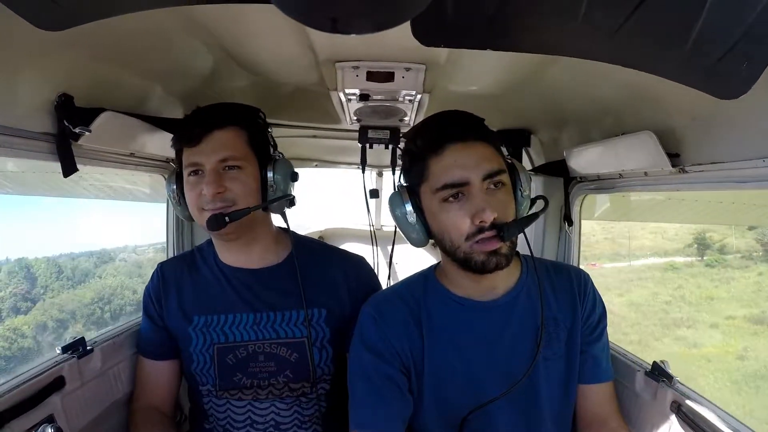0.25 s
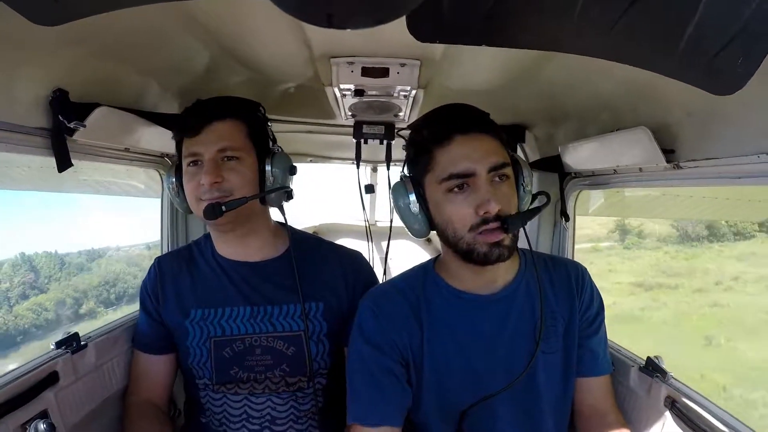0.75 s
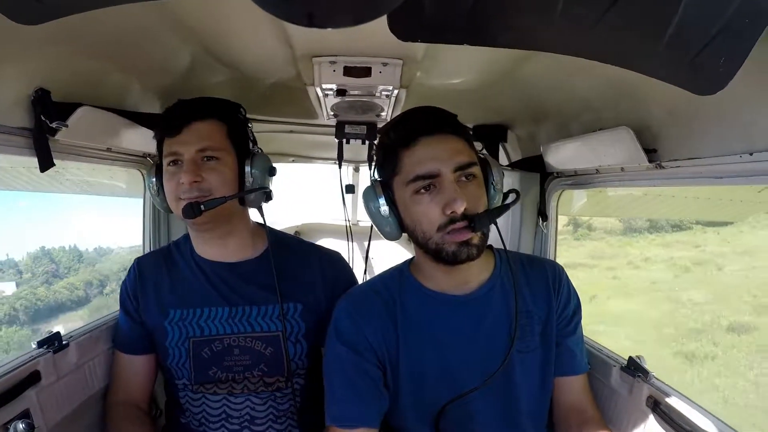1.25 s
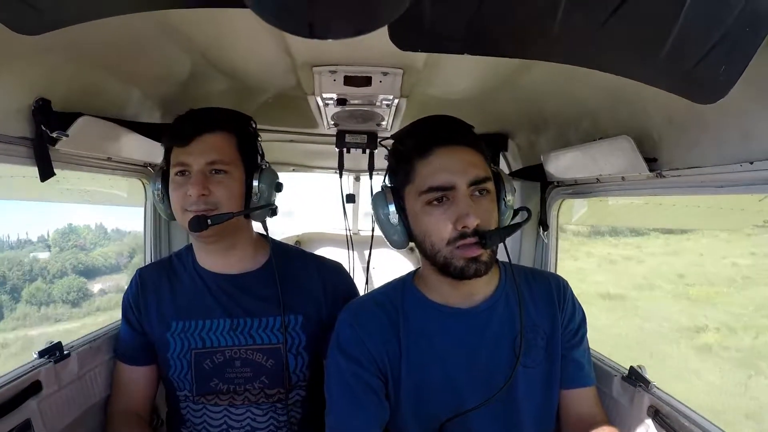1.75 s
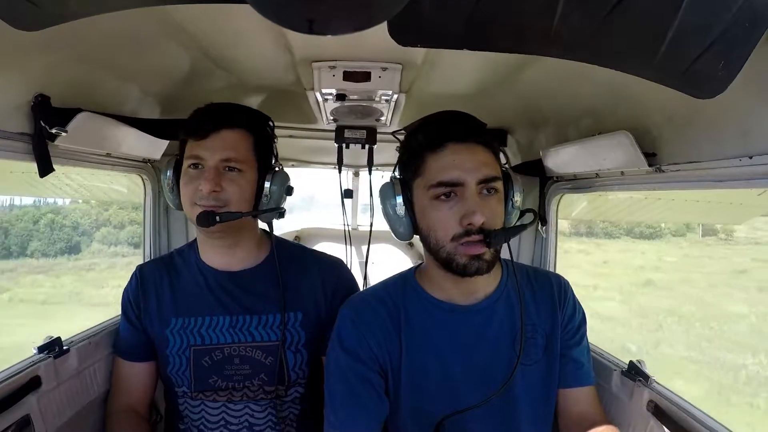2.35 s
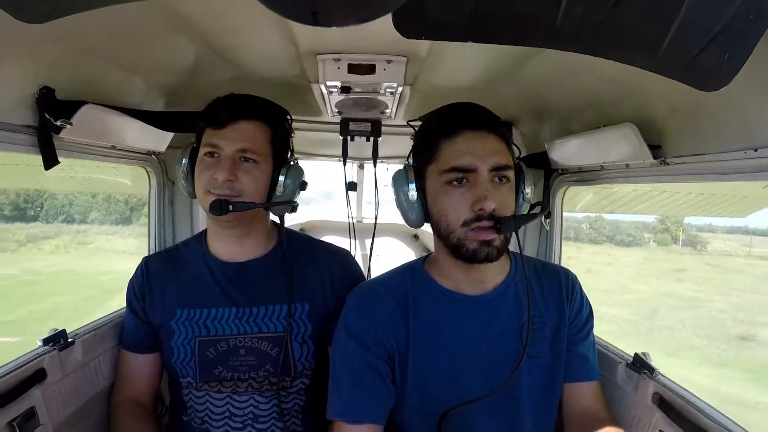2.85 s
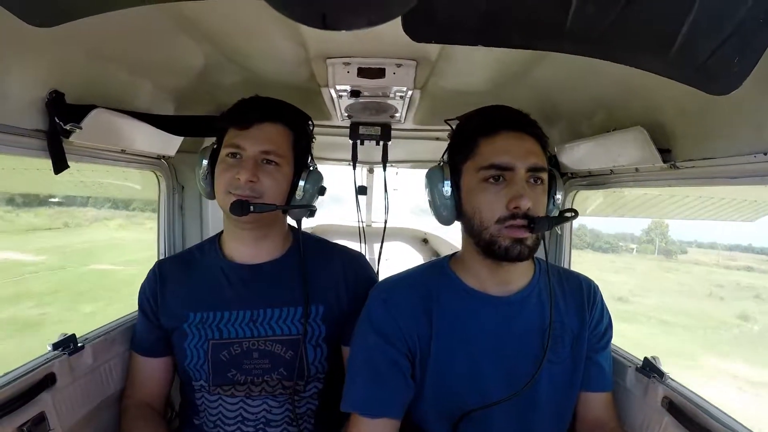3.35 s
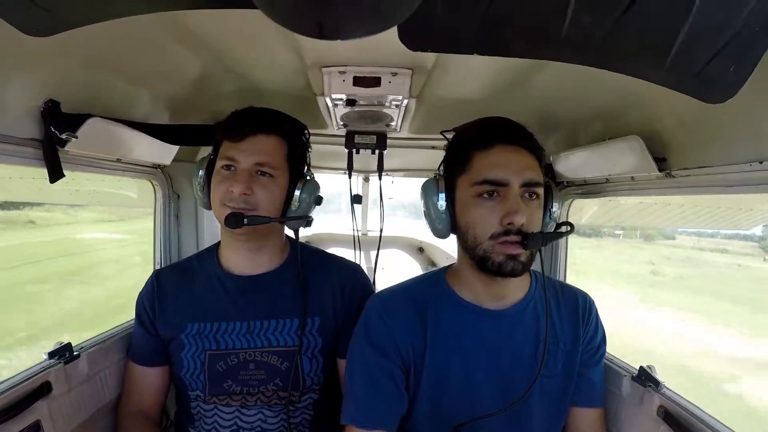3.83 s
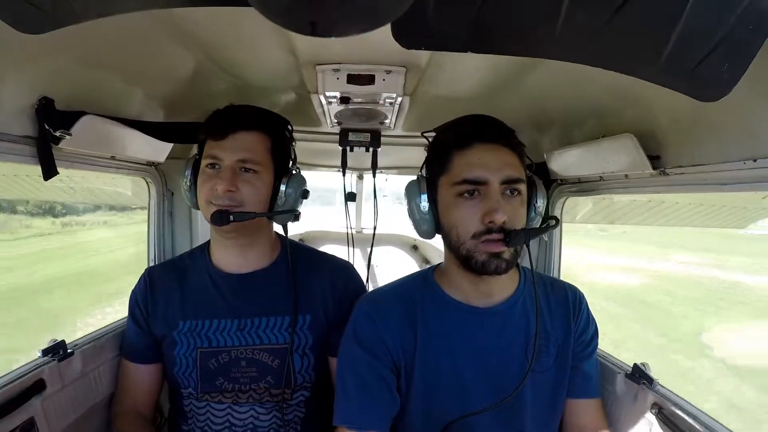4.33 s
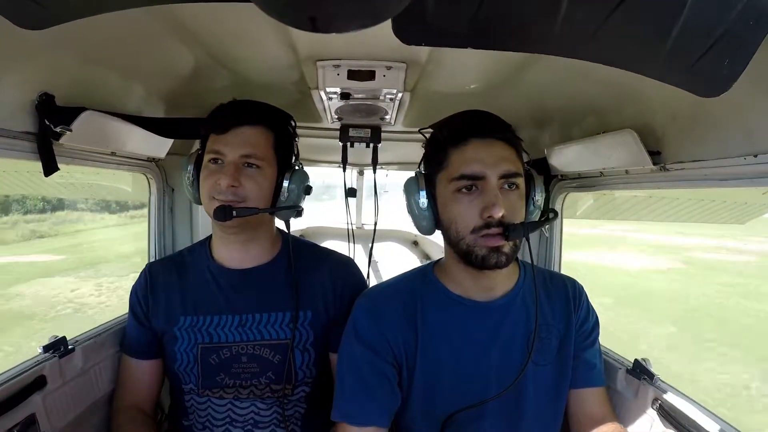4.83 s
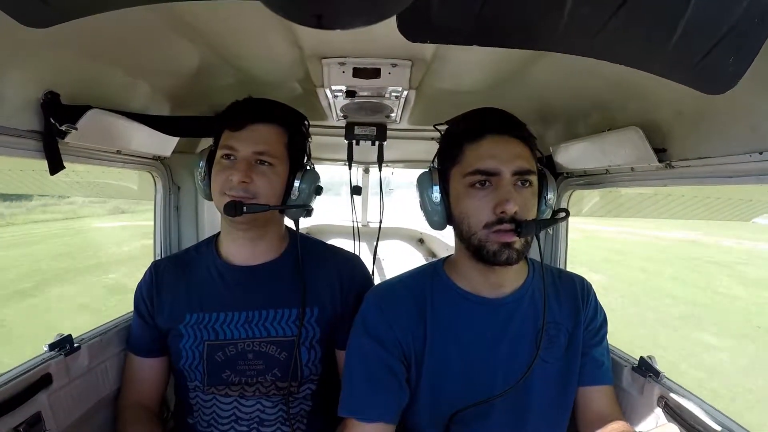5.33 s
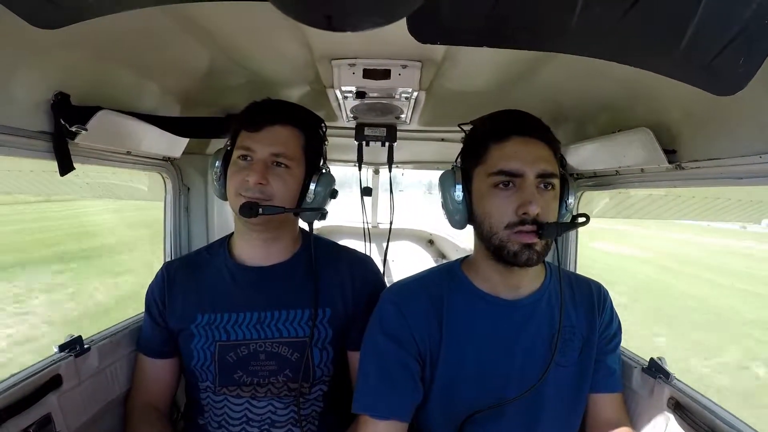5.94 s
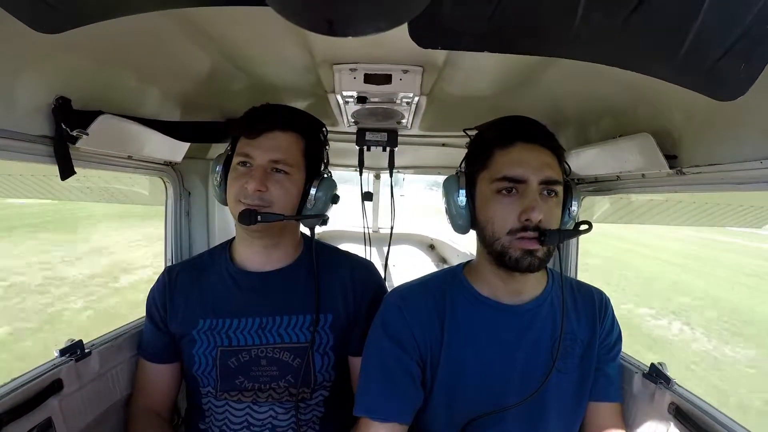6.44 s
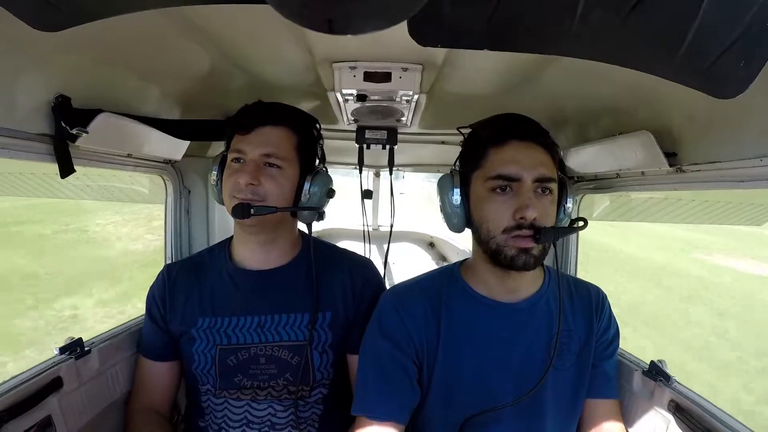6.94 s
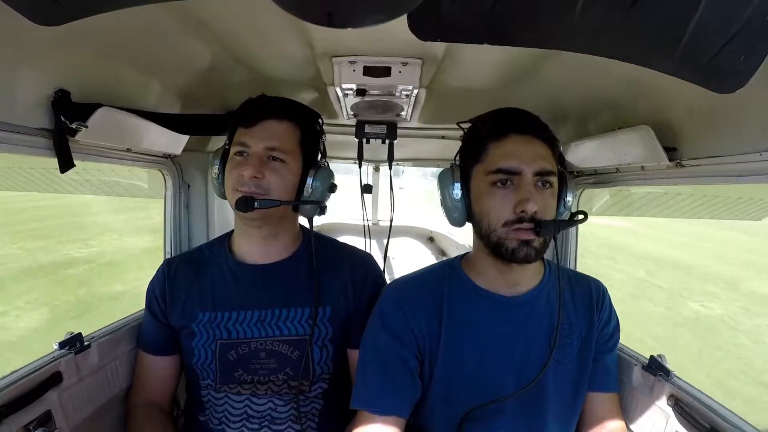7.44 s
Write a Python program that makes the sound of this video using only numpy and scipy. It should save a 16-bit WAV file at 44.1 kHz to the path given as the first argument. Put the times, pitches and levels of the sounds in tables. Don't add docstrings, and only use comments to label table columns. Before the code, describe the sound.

Low lumpy wind roar buffets a small microphone inside a gliding light aircraft cabin, with hard bassy slaps and thin gusty hiss.

```python
import sys
import numpy as np
from scipy import signal
from scipy.fft import rfft, irfft
from scipy.io import wavfile
from scipy.ndimage import uniform_filter1d

SR = 44100
rng = np.random.default_rng(int(sys.argv[2]) if len(sys.argv) > 2 else 0)


def generate_wav(signal):
    frames = np.transpose(np.atleast_2d(signal))
    scaled = np.clip(frames, -1, 1) * 32767
    pcm = np.round(scaled).astype(np.int16)
    wavfile.write(sys.argv[1], SR, pcm)


def ratio_of_db(decibels):
    return 10 ** (np.asarray(decibels, float) / 20)


N = 338688


def evened(x):
    return x / np.sqrt(np.mean(x ** 2) + 1e-20)


def curve(rows, column, t):
    rows = np.asarray(rows, float)
    return np.interp(t, rows[:, 0], rows[:, column])


def bumps(rows, t):
    return sum(db * np.exp(-4 * ((t - middle_s) / length_s) ** 2) for middle_s, db, length_s in rows)


def flicker(low_hz, high_hz):
    step = 32
    count = N // step + 1
    hz = np.fft.rfftfreq(count, step / SR) + 1e-3
    low_cut = (hz / (low_hz + hz)) ** 2
    shape = low_cut / np.sqrt(hz) / (1 + (hz / high_hz) ** 2)
    slow = irfft(rfft(rng.standard_normal(count)) * shape, count)
    return evened(np.interp(np.arange(N) / step, np.arange(count), slow))


def turbulence(shape, size, patchy_db, patch_hz, patch_s, tilt, pivot_hz):
    hop = size // 4
    frames = N // hop + 5
    hz = np.fft.rfftfreq(size, 1 / SR) + 1
    real, imaginary, patches = rng.standard_normal((frames, len(hz), 3)).T
    patches = uniform_filter1d(patches, max(1, round(patch_hz * size / SR)), 0)
    patches = evened(uniform_filter1d(patches, max(1, round(patch_s * SR / hop)), 1))
    shape_hz, shape_db = np.transpose(shape)
    colour = ratio_of_db(np.interp(np.log(hz), np.log(shape_hz), shape_db, left=-150))[:, None]
    lean = tilt[np.minimum(np.arange(frames) * hop, N - 1)]
    octaves = np.clip(np.log2(hz / pivot_hz), -.7, 1.3)[:, None]
    leaned = colour * ratio_of_db(octaves * lean)
    leaned *= np.linalg.norm(colour) / np.linalg.norm(leaned, axis=0)
    spectra = (real + 1j * imaginary) * leaned * ratio_of_db(patchy_db * patches)
    return evened(signal.istft(spectra, nperseg=size, noverlap=size - hop)[1][:N])


# start_s, speed_db (about the mean), seal_opening_db, leak_brightness_db_per_octave
AIRFLOW = [(0, -1, 0.5, 1), (.62, 0.1, 2, 1.5), (.9, 0, 0.5, 1), (1.35, 1, 0.5, 2), (1.6, 1, -1, -.5),
           (2.05, 0, 0, 1), (2.4, 2.5, -0.5, 0.5), (2.55, -1.5, 1, -.5), (3.6, -0.83, -0.5, -.5),
           (4.35, -1.5, 1.5, 1.5), (4.8, 3, 1, 1), (5.15, 0.5, -1.5, -1), (5.45, 1.5, -1, 0),
           (5.85, 0, 0, -.5), (6.58, -1.5, 2.5, 0), (6.75, 1.5, 0.5, 1.5), (7.35, 2, 2, 0.5),
           (7.68, 2, -0.5, -1.5)]


def airflow(t):
    return curve(AIRFLOW, 1, t), curve(AIRFLOW, 2, t), curve(AIRFLOW, 3, t)


# middle_s, level_db, length_s
PUFFS = [(0.26, 5, .05), (.309, -4, 0.025), (.394, -2, 0.04), (0.492, 3, .04), (0.52, -3, .03),
         (0.726, 1, .07), (0.88, -1, 0.1), (1.066, 2.5, 0.055), (1.344, -2, 0.035), (1.378, 1.5, 0.037),
         (1.703, -0.5, 0.037), (1.735, 5.5, 0.02), (2.332, 6, 0.033), (2.358, -8, 0.034),
         (2.44, -0.5, 0.044), (3.238, 1.5, 0.054), (4.06, 2, 0.18), (4.617, -0.5, 0.08), (4.77, 2.5, .06),
         (4.835, -7, 0.018), (4.848, 4, 0.02), (5.053, -2.5, 0.043), (5.293, -3, .07), (5.798, -3, 0.16),
         (5.954, 1, 0.084), (6.637, -4.5, 0.042), (6.91, -3.5, 0.025), (6.978, 6, 0.02), (7.194, -3, 0.13),
         (7.261, 4.5, 0.036)]


def puffs(t):
    return bumps(PUFFS, t)


# start_s, strength_db (about the mean), fineness (small fast eddies +, large slow ones -)
BUFFETING = [(0, 0, 1), (.9, 3.5, -1.2), (1.4, 1.5, 1.4), (1.7, 4.5, -1.3), (2.3, 0.5, 0),
             (2.55, -1.5, -0.3), (2.9, -4, 0.64), (3.2, 0, -0.98), (3.6, -7, -0.71), (4.05, 4.5, -1),
             (4.5, 1.5, 0.59), (4.8, 3.5, 0.17), (5.55, -5.5, 1.1), (6.25, 1, 0.21), (6.6, -5, 1.9),
             (7.0, 2, -1.3), (7.25, 1.5, -0.64), (7.5, -8.5, 2.5)]


def buffeting(t):
    return curve(BUFFETING, 1, t), curve(BUFFETING, 2, t)


# pitch_hz, level_db (per Hz)
LEAK_SHAPE = [(1940, -41), (3300, -2.5), (4520, 3), (5780, 1.5), (7160, -2), (8930, 3), (11900, -12),
              (14000, -21), (14900, -29)]


def leak(flow, opening, bright, puff, gust, flutter):
    tilt = bright - .2 * puff + 0.25 * flicker(.8, 7)
    air = turbulence(LEAK_SHAPE, size=256, patchy_db=0.76, patch_hz=2000, patch_s=0.026, tilt=tilt, pivot_hz=6500)
    swell_db = 1.27 * flow + opening + 0.69 * puff
    wobble_db = 0.54 * gust + 0.92 * flutter + 0.22 * flicker(30, 300)
    return air * ratio_of_db(-50 + swell_db + wobble_db)


# pitch_hz, level_db (per Hz)
RUSH_SHAPE = [(150, 0.5), (450, -1.5), (900, -2.5), (1700, -5.5), (2200, -11.5), (2800, -19), (3300, -29.5),
              (4500, -49)]


def rush(flow, puff, gust, flutter):
    tilt = .45 - 0.32 * puff + .6 * flicker(0.88, 13)
    air = turbulence(RUSH_SHAPE, size=512, patchy_db=0.92, patch_hz=700, patch_s=.04, tilt=tilt, pivot_hz=1200)
    wobble_db = 0.62 * gust + 1.4 * flutter + 0.12 * flicker(9.1, 60)
    return air * ratio_of_db(-36.5 + flow + 1.13 * puff + wobble_db)


# middle_s, level_db, length_s
SHUDDERS = [(.25, 3.5, .1), (.55, 0, 0.053), (.92, 4, 0.046), (1.08, 4, .1), (1.43, 3.5, 0.042),
            (1.58, 4, .05), (1.75, 3, 0.045), (2.03, -2, .06), (2.22, 3.5, 0.14), (2.62, 4, .1),
            (3.38, 3.5, 0.071), (3.75, -2.5, .2), (4.4, 0, 0.13), (4.77, 4.5, 0.075), (5.45, 2.5, 0.089),
            (6.4, -0.5, 0.2), (6.85, 1, .12), (7.08, 4, .04), (7.16, 5, 0.037), (7.45, 1.5, .2)]


def shudders(t):
    return bumps(SHUDDERS, t)


# pitch_hz, level_db (per Hz)
ROAR_SHAPE = [(12, -13), (40, -1.5), (160, 0), (250, -4), (340, -9.5), (460, -15.5), (800, -23.5),
              (1600, -65)]


def roar(beat, fine, flow, shudder, gust):
    tilt = -1.1 - 0.34 * beat + 0.66 * flow + 0.63 * flicker(2.5, 11)
    air = turbulence(ROAR_SHAPE, size=2048, patchy_db=0.66, patch_hz=120, patch_s=0.03, tilt=tilt, pivot_hz=264)
    drive_db = 0.43 * beat + 1.26 * fine + 0.87 * flow + shudder
    wobble_db = 1.1 * gust + 0.48 * flicker(6.8, 40)
    return air * ratio_of_db(-32.5 + drive_db + wobble_db)


def small_thumps(count):
    low_hz, high_hz, spread_db = 32, 110, 4.5
    when, size, pitch = rng.random((count, 3)).T
    middle_s = when * N / SR
    beat, _ = buffeting(middle_s)
    level_db = -21.5 + beat + spread_db * (2 * size - 1)
    return list(zip(middle_s, level_db, low_hz * (high_hz / low_hz) ** pitch))


# middle_s, peak_db, pitch_hz
THUMPS = [(.061, -11, 104), (.216, -9, 89), (.259, -7, 80.4), (.447, -7.5, 89), (.757, -8, 90),
          (1.172, -7.5, 101), (1.414, -13, 89), (1.499, -8, 63.4), (1.678, -11.5, 49.3), (1.739, -5.5, 102),
          (1.944, -10.5, 57.7), (2.007, -9, 88), (2.184, -10.5, 50), (2.29, -10.5, 38.3), (3.349, -16, 116),
          (3.624, -15.5, 50.5), (3.951, -12.5, 50), (4.194, -12, 63), (4.769, -6.5, 89), (4.976, -13, 79.6),
          (5.158, -11, 80), (5.75, -17, 32), (5.84, -16.5, 40), (6.028, -15.5, 32), (6.142, -9.5, 65.5),
          (6.376, -10.5, 51), (6.865, -11, 63), (6.985, -8, 63), (7.162, -9.5, 88), (7.25, -12, 63)]


def thumps():
    rows = list(THUMPS) + small_thumps(count=60)
    out = np.zeros(N)
    for middle_s, level_db, hz in rows:
        turns = np.arange(round(2.1 * SR / hz)) * hz / SR
        pressure = np.cos(2 * np.pi * (turns + rng.random()))
        slap = ratio_of_db(level_db - 1.3) * np.hanning(len(turns)) * pressure
        first = max(0, round(middle_s * SR) - len(slap) // 2)
        part = out[first:][:len(slap)]
        part += slap[:len(part)]
    return out


# pitch_hz, level_db (per Hz)
BUFFET_SHAPE = [(7.1, -25), (12, 2.5), (32, 1.5), (97, 0), (126, 0.5), (155, -22.5), (200, -58),
                (340, -120)]


def buffet(beat, fine, gust):
    tilt = -.6 + 0.5 * fine + 2.0 * flicker(2.5, 6.6)
    air = turbulence(BUFFET_SHAPE, size=2048, patchy_db=0.0, patch_hz=70, patch_s=.035, tilt=tilt, pivot_hz=60)
    return air * ratio_of_db(-23.5 + beat + 0.41 * gust + 1.42 * flicker(2.4, 20))


def scene():
    t = np.arange(N) / SR
    flow, opening, bright = airflow(t)
    puff = puffs(t)
    beat, fine = buffeting(t)
    gust, flutter = flicker(6, 53), flicker(47, 340)
    air = leak(flow, opening, bright, puff, gust, flutter)
    air += rush(flow, puff, gust, flutter)
    air += roar(beat, fine, flow, shudders(t), gust)
    air += thumps()
    air += buffet(beat, fine, gust)
    return air[None]


def roll_off(x):
    return signal.sosfilt(signal.butter(12, 15030, fs=SR, output="sos"), x)


# pitch_hz, level_db
ROLL_OFF = [(0, -42), (9, 0), (12000, 0), (13500, -3), (14300, -2), (14800, -6), (15100, -12), (16000, -40)]


def record(dry):
    ceiling = ratio_of_db(-7)
    rounded = ceiling * np.tanh(1.12 * dry / ceiling)
    hz, level_db = np.transpose(ROLL_OFF)
    response = ratio_of_db(np.interp(np.fft.rfftfreq(N, 1 / SR), hz, level_db))
    limited = irfft(rfft(rounded) * response, N)
    return roll_off(limited)


dry = scene()
out = record(dry)
generate_wav(out)
```